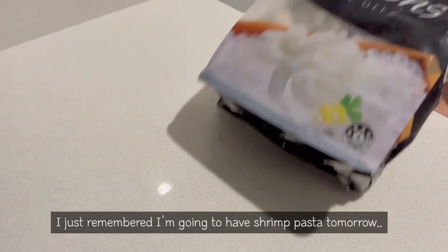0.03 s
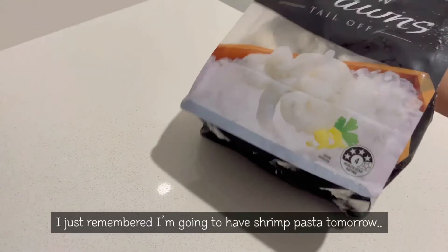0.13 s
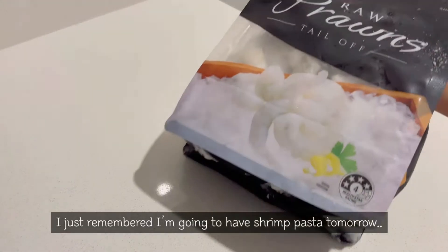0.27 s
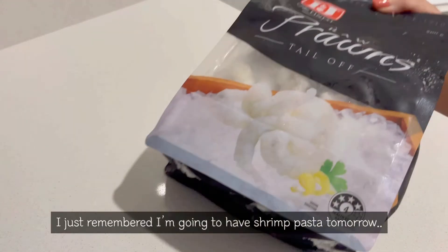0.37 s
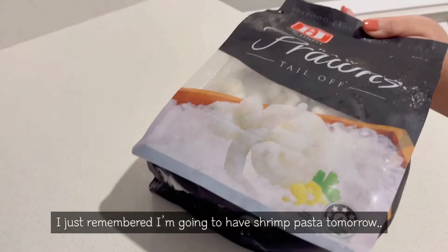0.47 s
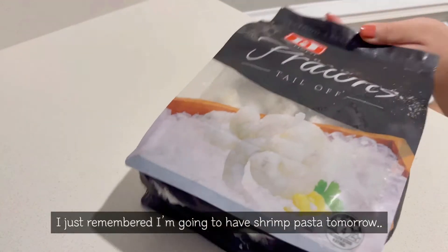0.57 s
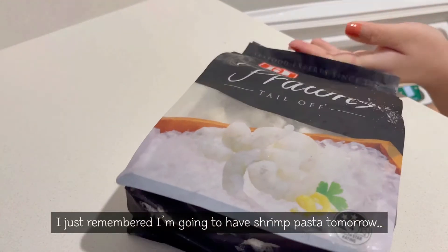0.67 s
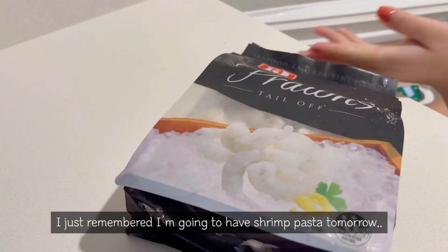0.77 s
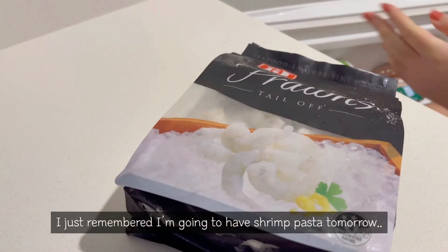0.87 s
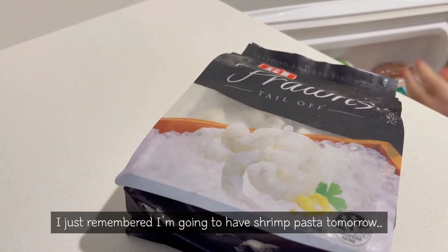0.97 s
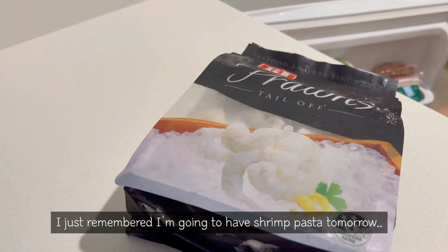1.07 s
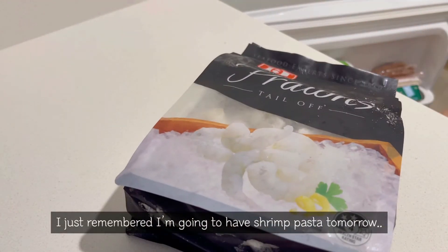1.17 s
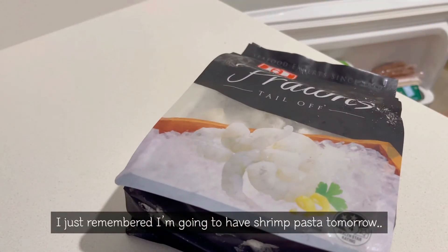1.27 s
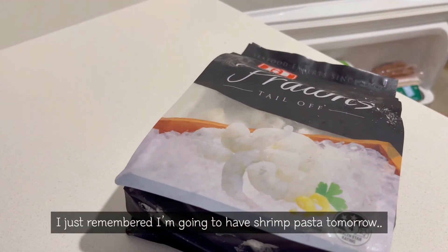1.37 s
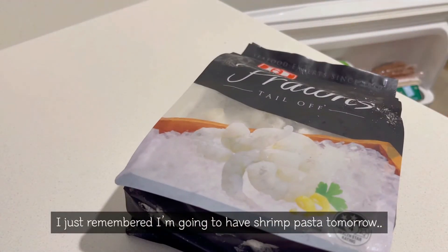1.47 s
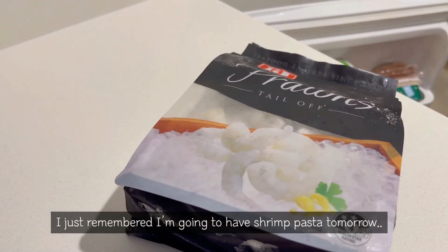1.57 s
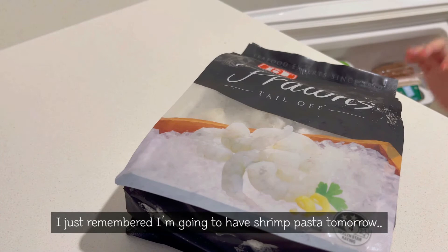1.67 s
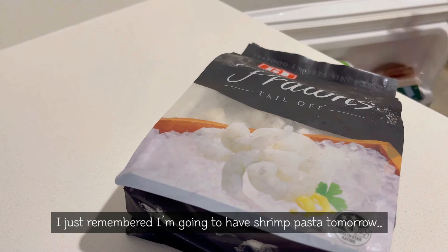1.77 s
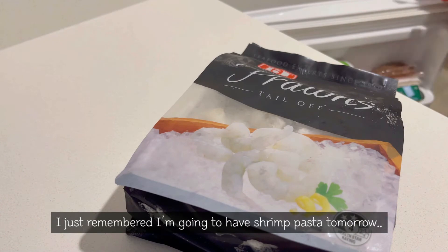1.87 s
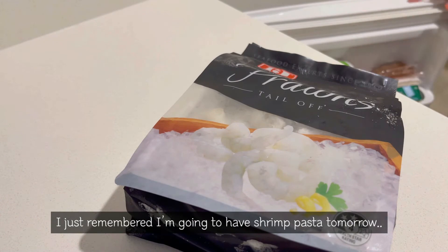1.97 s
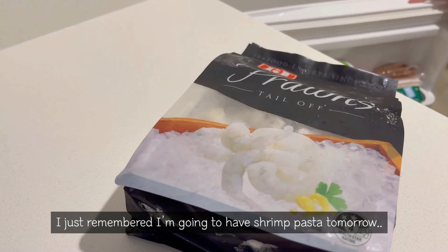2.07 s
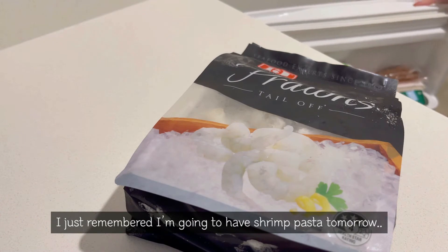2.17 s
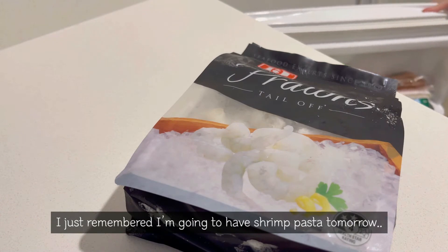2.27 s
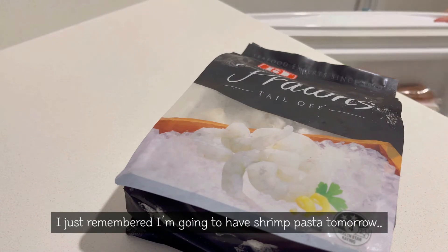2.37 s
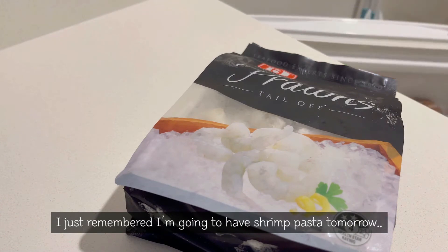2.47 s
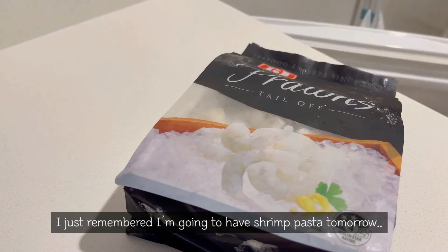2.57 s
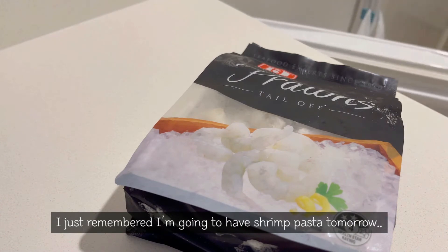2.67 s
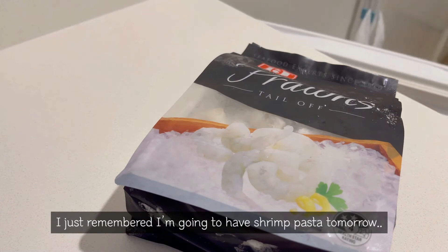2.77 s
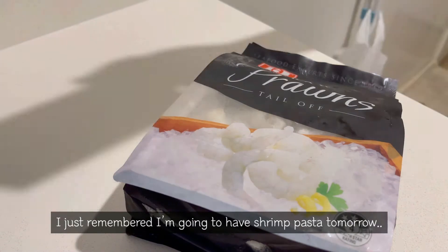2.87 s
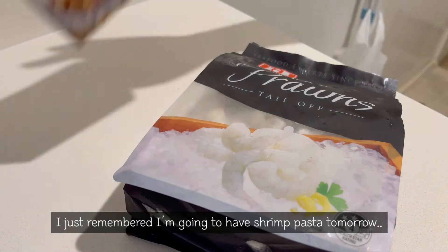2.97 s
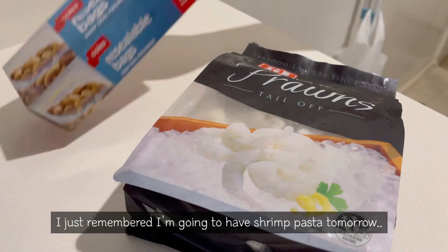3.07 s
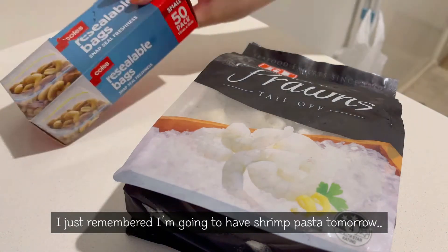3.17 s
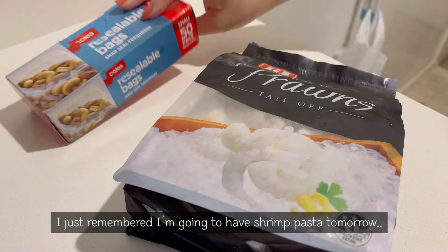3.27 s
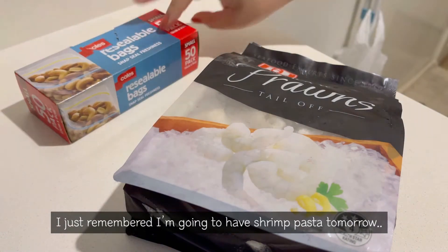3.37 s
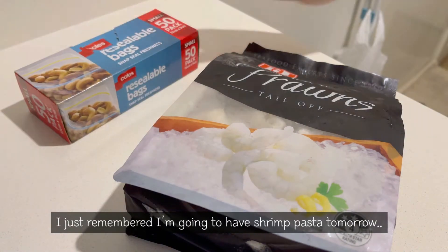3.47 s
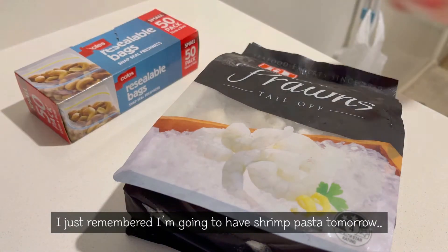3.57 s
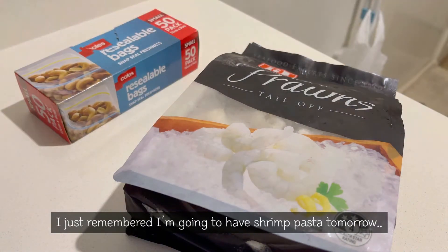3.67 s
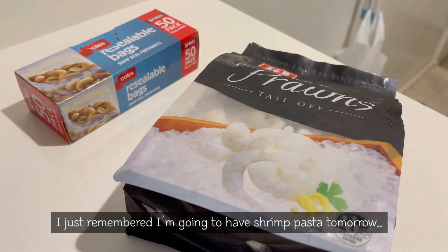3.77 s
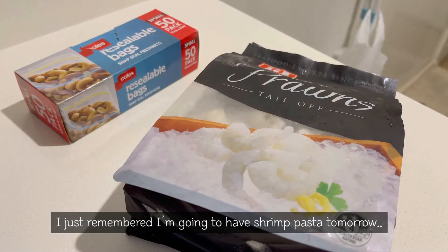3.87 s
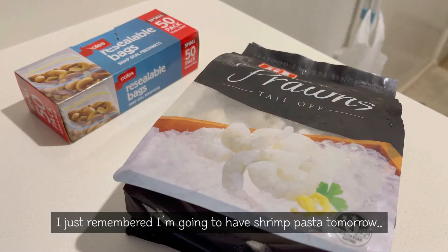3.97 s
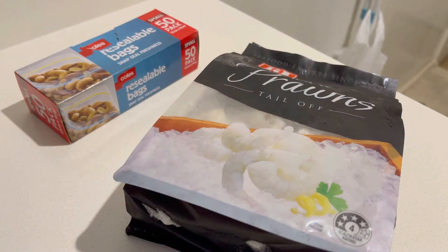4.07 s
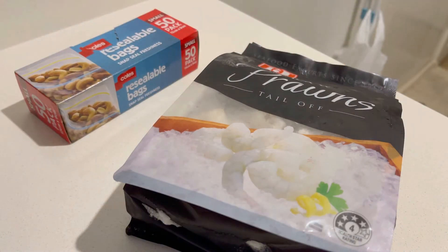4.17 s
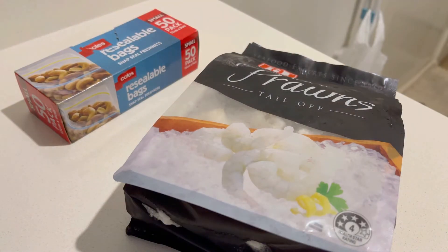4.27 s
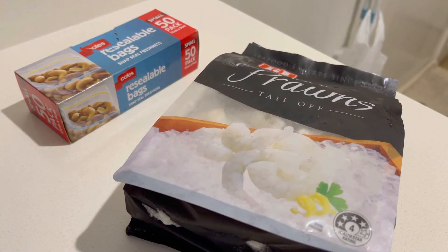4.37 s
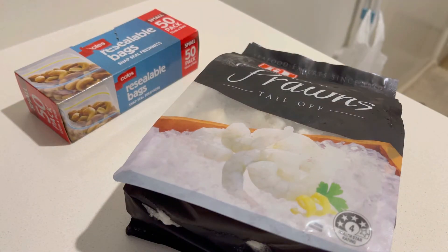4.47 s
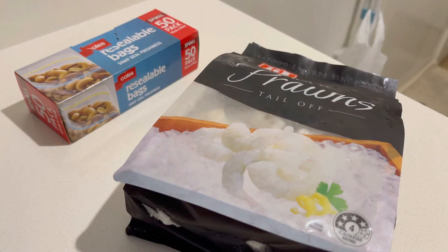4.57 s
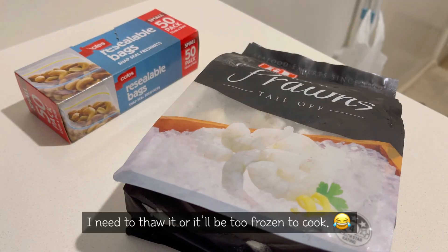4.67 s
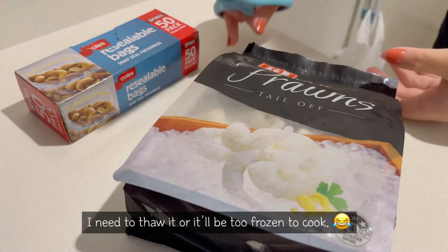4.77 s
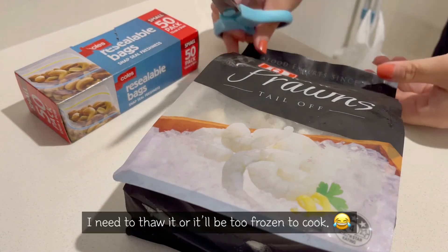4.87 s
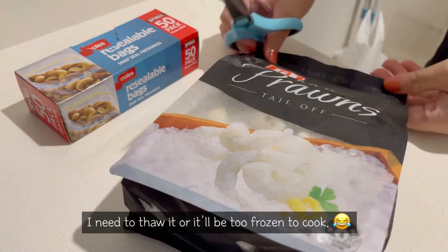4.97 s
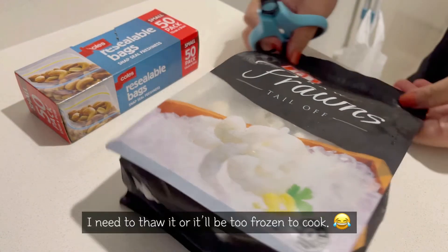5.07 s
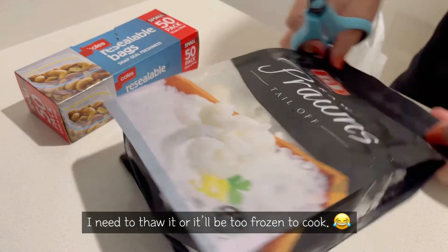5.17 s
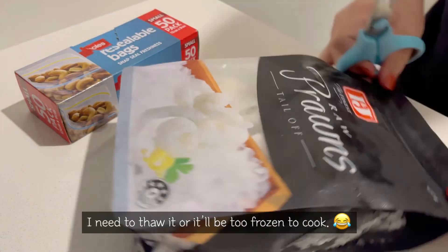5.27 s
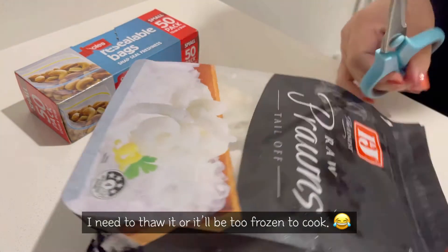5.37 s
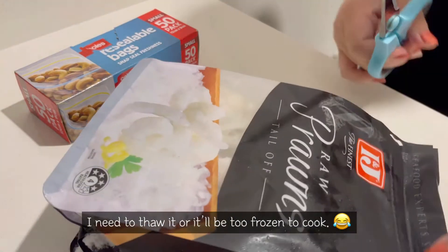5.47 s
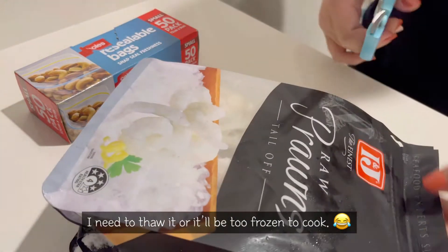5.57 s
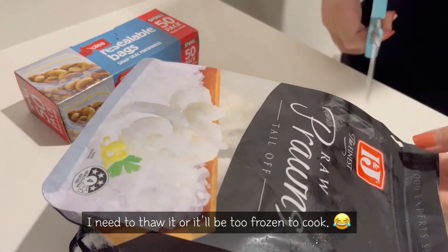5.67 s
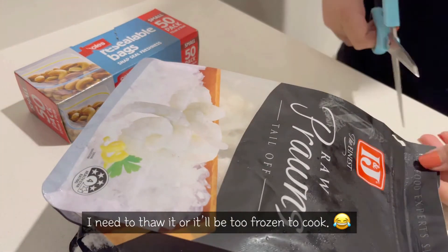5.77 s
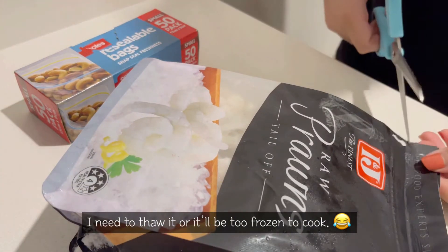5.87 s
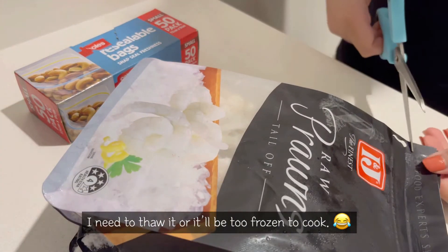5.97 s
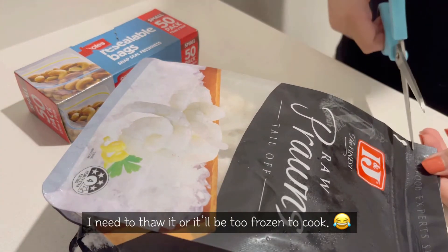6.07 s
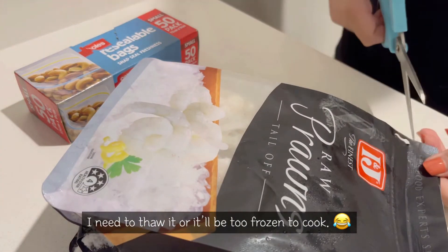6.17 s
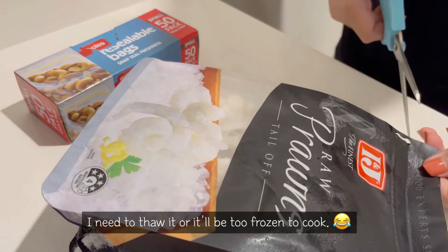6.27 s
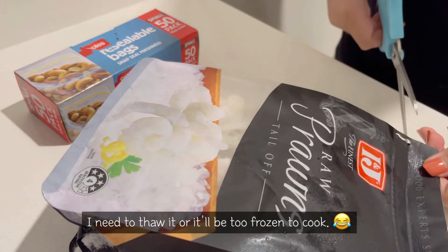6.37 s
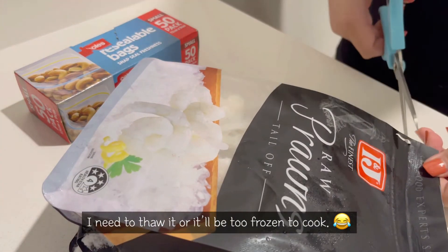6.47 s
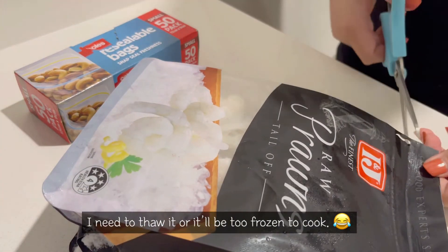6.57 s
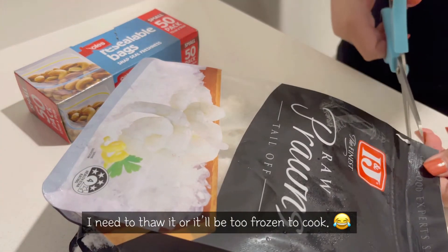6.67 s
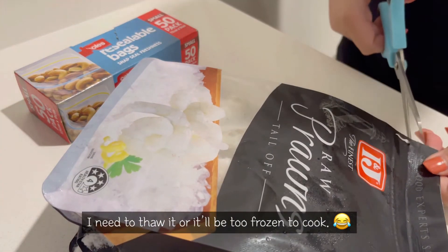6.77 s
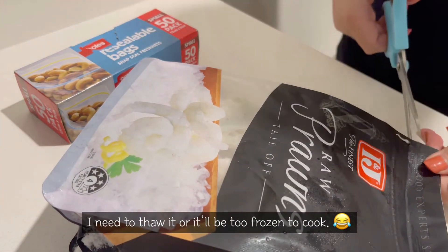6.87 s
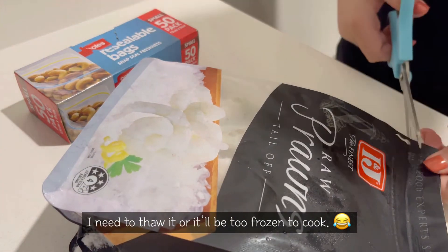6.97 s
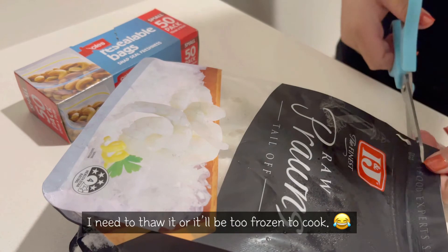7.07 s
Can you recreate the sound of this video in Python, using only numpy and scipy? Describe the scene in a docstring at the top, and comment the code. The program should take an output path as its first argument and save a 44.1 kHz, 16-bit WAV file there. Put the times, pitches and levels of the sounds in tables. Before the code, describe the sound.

A frozen bag of prawns crackles and clacks down on a counter, a cardboard box slaps beside it, then the bag is turned and snipped.

```python
"""Frozen prawns on a kitchen counter

A bag of frozen prawns is swung down: bursts of noise crackle as film, falling tones clack and thud as the load.
Filtered clicks shut a freezer further off, and a cardboard box slaps down with short damped tones.
The bag is turned, then scissors rasp and bite at its top. Quiet air, footsteps and a low drone lie behind.
Two microphone ports close above the counter hear it all in a small kitchen built from decaying noise.
"""
import sys
import numpy as np
from scipy import signal
from scipy.fft import rfft, irfft, next_fast_len
from scipy.io import wavfile

SR = 44100
rng = np.random.default_rng(int(sys.argv[2]) if len(sys.argv) > 2 else 0)


def output_pcm(signal):
    """Save a mono or channel-first signal as 16-bit PCM at the path in sys.argv[1].

    Samples are clipped to [-1, 1] before scaling.
    """
    pcm = np.clip(np.atleast_2d(signal).T, -1, 1) * 32767
    wavfile.write(sys.argv[1], SR, np.round(pcm).astype(np.int16))


N = 314433
TIME = np.arange(N) / SR  # seconds through the whole scene
AGE = np.arange(8192) / SR  # seconds since a single blow; each blow lasts at most 0.19 s

# The hands swing, lower, settle, grip, turn and nudge the bag. Each row: start in seconds (never before 0),
# attack in seconds, hold in seconds, relative level in dB.
BAG_MOVES = [(-.04, 0.023, 0.38, -35.5), (.36, 0.027, 0.3, -33.5), (.68, 0.071, 0.35, -55.5),
             (4.79, 0.043, 0.12, -49.5), (4.86, 0.14, 0.36, -37), (5.39, 0.019, 0.057, -49.5),
             (5.52, 0.052, 0.022, -60), (5.715, 0.002, 0.0037, -51)]


def handling():
    """The effort of the hands on the bag, which drives its crinkling and the counter's rumble."""
    return gestures(BAG_MOVES, release_s=0.16)


# The film buckling. Each row: time in seconds, relative level in dB, swell time in seconds,
# pitch of the ringing patch in Hz.
FILM_BUCKLES = [(0.028, -13.5, 0.0024, 1040), (0.1125, -24.5, 0.0028, 652), (0.1746, -28.5, 0.0056, 1543),
                (0.2111, -20, 0.0025, 1630), (0.296, -25, 0.004, 2039), (0.3872, -27.5, 0.0024, 1309),
                (0.4231, -23, 0.0025, 2917), (0.4795, -19, 0.0014, 1000), (0.5078, -21.5, 0.0018, 1642),
                (0.552, -21.5, 0.0022, 1570), (0.5676, -18.5, 0.002, 1112), (0.581, -21.5, 0.003, 1206),
                (0.6091, -15, 0.0022, 927), (0.6214, -28.5, 0.0012, 1800), (0.8164, -26, 0.00089, 2460),
                (4.982, -32.5, 0.001, 1494), (5.0598, -14.5, 0.0018, 1200), (5.2337, -23, 0.0019, 2790),
                (5.242, -31, 0.0047, 1160), (5.308, -20, 0.0018, 2280), (5.3987, -26.5, 0.00057, 4170)]
# Small sharp creases of the film. Each row: time in seconds, relative level in dB.
FILM_CREASES = [(0.6, -22), (0.678, -36.5), (0.695, -38.5), (1.0737, -66), (4.798, -50.5), (4.835, -46.5),
                (4.908, -44), (6.139, -45.5), (6.2598, -52), (6.644, -58.5), (6.831, -54.5), (7.091, -54)]
# Colour of the fine crinkling. Each row: frequency in Hz, relative level in dB.
CRINKLE_COLOUR = [(100, -13.5), (400, 3.5), (1100, -0.5), (5000, -5), (16000, -5.5)]
# Pitches at which the larger folds pop. Each entry: frequency in Hz.
FOLD_PITCHES = (750, 1400, 2600)


def bag(flex):
    """Film buckles and creases suddenly over fine crinkling and pitched pops of folds; prawns knock inside."""
    buckles = []
    flurry_moves = []
    for s, db, swell, hz in FILM_BUCKLES:
        tilt = 0.056 + 0.2164 * (db + 15)  # dB per octave: a harder buckle is brighter
        buckles.append((s, db, swell, tilt, hz))
        flurry_moves.append((s, swell, swell, db - 19))  # each buckle sets off fine crinkling
    flurries = gestures(flurry_moves, release_s=0.19)
    creases = [(s, db, 0.0015, 0.66, 8500) for s, db in FILM_CREASES]  # swell s, tilt dB per octave, body Hz

    # hiss is the smooth rubbing of the film beside its crackle
    fine = crackle(CRINKLE_COLOUR, rate=480, spread_db=4, grain_s=0.0004, hiss=0.25, apart=1.0)
    folds = 0
    for hz in FOLD_PITCHES:
        pop_colour = [(hz / 2, -20), (hz, 0), (2 * hz, -20), (8 * hz, -40)]
        folds = folds + crackle(pop_colour, rate=60, spread_db=3.5, grain_s=0.0006, hiss=0, apart=1.0)
    crinkling = (undb(-4) * fine + undb(-12.5) * folds) * np.hypot(flex, flurries)

    buckling = cracks(buckles, body_db=6, body_octaves=0.55, apart=0.25)
    creasing = cracks(creases, body_db=0.5, body_octaves=0.5, apart=0.5, even=True)
    return buckling + creasing + crinkling + prawns(sag_s=0.0045, cycles=1.1)


# Prawns knocking on the counter through the bag. Each row: time in seconds, relative level in dB,
# nominal pitch in Hz (the clack starts above it and falls through it).
PRAWN_KNOCKS = [(.054, -10, 926), (.0618, -15, 1020), (.126, -26, 610), (.2535, -16, 850), (.6125, -6, 729),
                (2.06, -39, 847), (5.019, -23.5, 610), (5.109, -17.5, 710), (5.167, -18, 686),
                (5.316, -16.5, 720), (6.333, -39.5, 840), (6.379, -36.5, 800), (7.108, -41.5, 670)]


def prawns(sag_s, cycles):
    """A clack of a few cycles whose pitch falls, as the high bending waves of the slab arrive first."""
    out = np.zeros((2, N))
    for s, db, hz in PRAWN_KNOCKS:
        turns = np.sqrt(2) * hz * sag_s * np.log(1 + AGE / sag_s)
        phase = 0.5 * rng.standard_normal((2, 1))  # radians, different at each port
        envelope = (1 - np.exp(-turns)) * np.exp(-turns / cycles)
        add(out, s, 2 * undb(db) * np.sin(2 * np.pi * turns + phase) * envelope)
    return out


# Strokes of the blades along the film. Each row: start in seconds, attack in seconds, hold in seconds,
# relative level in dB.
BLADE_STROKES = [(5.845, 0.0078, 0.077, -57), (6.03, 0.074, 0.037, -58), (6.25, 0.015, 0.11, -64),
                 (6.63, 0.04, 0.065, -63), (6.8, 0.12, 0.22, -57)]


def cutting():
    """The effort of the blades, which drives their rasp and the counter's rumble."""
    return gestures(BLADE_STROKES, release_s=0.95)


# Blades biting through the film. Each row: time in seconds, relative level in dB.
BITES = [(5.857, -43), (5.938, -46.5), (6.158, -32), (6.197, -42), (6.283, -48), (6.421, -50), (6.591, -45)]
# Colour of the rasp. Each row: frequency in Hz, relative level in dB.
RASP_COLOUR = [(100, 2.5), (500, -1), (2300, 1.5), (5000, -6.5), (16000, -12)]
# Resonances of the blades against the taut film. Each row: frequency in Hz, boost in dB.
BLADE_RESONANCES = [(1530, 0.95), (2080, 5), (2500, 2.6), (2920, 5.3)]


def scissors(shear):
    """Blades scrape along the film and bite it in steps; their resonances colour both sounds."""
    pitches = 1920 * 2 ** rng.uniform(-0.26, 0.42, len(BITES))  # Hz, a different patch for each bite
    bites = [(s, db, 0.0015, -4.5, hz) for (s, db), hz in zip(BITES, pitches)]  # swell s, tilt dB per octave
    rasp = crackle(RASP_COLOUR, rate=300, spread_db=3, grain_s=0.001, hiss=0.65, apart=0.74)
    scrape = rasp * shear * undb(0.79 * walk(24))
    cut = cracks(bites, body_db=2.5, body_octaves=1.0, apart=0.32, even=True) + scrape

    def blades(hz):
        width_hz = 120
        return sum(db / (1 + (2 * (hz - centre) / width_hz) ** 2) for centre, db in BLADE_RESONANCES)

    return colour(cut, [(1920, -2)], blades)  # a single point is the same at all frequencies


# Weight landing on the counter and bumps against it. Each row: time in seconds, relative level in dB,
# settled pitch in Hz.
COUNTER_THUDS = [(0.03, -27, 123), (0.125, -29, 211), (0.3, -23, 132), (0.6225, -11.5, 127),
                 (3.096, -24.5, 131), (3.298, -21.5, 188), (4.712, -35.5, 116), (5.347, -21, 155),
                 (5.757, -41, 118.5), (5.875, -38, 143), (5.943, -32.5, 114), (6.598, -38.5, 122)]
# Ringing of the counter slab. Each row: frequency in Hz, time to fall by 60 dB in seconds (before the
# fade at 0.19 s), relative level in dB.
SLAB_RINGING = [(119, 0.41, -13.5), (361, 0.19, -23.5)]
# Colour of low rumbling, in the counter and the floor. Each row: frequency in Hz, relative level in dB.
RUMBLE_COLOUR = [(30, -12), (70, 0.5), (135, 1.5), (450, -17), (4000, -50)]


def counter(effort):
    """Heavy contacts sink in pitch as they settle and ring the slab; work on the slab makes it rumble."""
    out = np.zeros((2, N))
    # each bite also knocks the bag against the counter, a little later and softer, at 258.6 Hz
    bite_knocks = [(s + 0.00617, db - 5, 258.6) for s, db in BITES]
    for s, db, hz in list(COUNTER_THUDS) + bite_knocks:
        pitch = hz * (1 + 0.51 * np.exp(-AGE / 0.0022))
        contact = np.sin(2 * np.pi * np.cumsum(pitch) / SR) * fade(0.064)
        envelope = (1 - np.exp(-AGE / 0.0023)) * (1 - (AGE / AGE[-1]) ** 2)
        add(out, s, undb(db + 6.0) * envelope * (contact + ring(SLAB_RINGING, scatter=0.087)))

    lag_s, growth = 0.042, 0.61  # smoothing time of the rumble, dB of rumble per dB of effort
    keep = np.exp(-1 / (lag_s * SR))
    smooth_effort = signal.lfilter([1 - keep], [1, -keep], effort)
    rumble_level = undb(-22) * smooth_effort ** growth
    unsteady = undb(4 * np.tanh(walk(15)))
    return out + rumble_level * unit(colour(pair(N, 0.35), RUMBLE_COLOUR)) * unsteady


# The box touching down, edge first and then flat. Each row: time in seconds, relative level in dB.
BOX_LANDINGS = [(3.0879, -29.5), (3.295, -20)]
# Panels and hollow of the box. Each row: frequency in Hz, time to fall by 60 dB in seconds,
# relative level in dB.
BOX_RINGING = [(238, 0.048, -1.5), (857, 0.049, 0), (1158, 0.041, 1)]
# Colour of a cardboard slap. Each row: frequency in Hz, relative level in dB.
SLAP_COLOUR = [(100, 6.5), (600, 8), (1200, 9), (1700, -3), (2300, 4), (3200, -6.5), (16000, -11)]


def box():
    """Dead cardboard slaps down in a few quick contacts; its panels and hollow ring briefly."""
    out = np.zeros((2, N))
    for s, db in BOX_LANDINGS:
        for lag_s, contact_db in ((0, -4), (0.004, 0), (0.009, -17)):
            slap = colour(burst(0.0012, apart=0.81, even=True), SLAP_COLOUR)
            add(out, s + lag_s, undb(db + contact_db) * slap)
        add(out, s, undb(db) * ring(BOX_RINGING, scatter=0.34) * (1 - AGE / AGE[-1]))
    return out


# Latches and things handled further off. Each row: time in seconds, relative level in dB,
# tilt in dB per octave, body pitch in Hz.
LATCH_CLICKS = [(1.5207, -44.5, 0.4, 2470), (1.592, -32.5, 0.55, 750), (1.9313, -35.5, 5, 1912),
                (2.1908, -51.5, 0.5, 2430), (2.6965, -48.5, 2.5, 1620), (3.9022, -52.5, -1, 799)]
# A faint ring after each click. Each row: frequency in Hz, time to fall by 60 dB in seconds (before the
# fade at 0.19 s), relative level in dB.
CLICK_RINGING = [(2625, 0.13, -17.5)]
# Things sliding, rustling and being picked up, away from the bag. Each row: start in seconds,
# attack in seconds, hold in seconds, relative level in dB.
SLIDING_MOVES = [(2.39, 0.045, 0.046, -64.5), (2.8, 0.074, 0.013, -44), (3.14, 0.12, 0.0075, -50),
                 (3.89, 0.014, 0.052, -57.5), (4.03, 0.07, 0.21, -66), (4.692, 0.0015, 0.02, -51.5)]
# Colour of the sliding. Each row: frequency in Hz, relative level in dB.
SLIDING_COLOUR = [(100, -6.5), (850, 0.5), (1800, -6.5), (4000, -14), (16000, -22.5)]
# Dull bumps and low rubs. Each row: time in seconds, relative level in dB, time to fall by 60 dB in
# seconds (before the fade that ends each one at 0.19 s), pitch in Hz.
DULL_BUMPS = [(0.94, -58.5, 1.9, 410), (3.656, -47, 0.7, 349.6), (4.09, -61, 2.4, 642)]
# Hollow colour of a bump or rub. Each row: frequency as a ratio to its pitch, relative level in dB.
BUMP_COLOUR = [(.4, -34), (1, 12), (1.6, -16), (8, -37.5)]


def freezer_and_handled_things():
    """Hard plastic clicks with a faint ring, grainy sliding and rustling, dull bumps and low rubs."""
    clicks = [(s, db, 0.00057, tilt, hz) for s, db, tilt, hz in LATCH_CLICKS]  # third column: swell s
    slide = crackle(SLIDING_COLOUR, rate=300, spread_db=4.5, grain_s=0.00097, hiss=0.83, apart=1.0)
    out = cracks(clicks, body_db=9.5, body_octaves=0.38, apart=0.59, even=True)
    out += undb(-2.5) * slide * gestures(SLIDING_MOVES, release_s=0.28)

    to_silence = 1 - AGE / AGE[-1]
    for s, db, tilt, hz in LATCH_CLICKS:
        add(out, s, undb(db) * ring(CLICK_RINGING, scatter=1) * to_silence)
    for s, db, t60, pitch in DULL_BUMPS:
        points = [(ratio * pitch, level) for ratio, level in BUMP_COLOUR]
        hollow = unit(colour(pair(len(AGE), apart=0.93), points))
        add(out, s, undb(db) * hollow * fade(t60) * to_silence)
    return out


# Someone moving about on the floor. Each row: start in seconds, attack in seconds, hold in seconds,
# relative level in dB.
FOOTFALLS = [(1.91, 0.026, 0.046, -54), (3.64, 0.037, 0.021, -54.5), (3.95, 0.11, 0.075, -52),
             (4.58, 0.097, 0.072, -53)]


def steps():
    """Someone moves about; each footfall is a swell of low noise, as if through the floor."""
    return gestures(FOOTFALLS, release_s=0.95) * unit(colour(pair(N, 0.36), RUMBLE_COLOUR))


# Colour of the still air. Each row: frequency in Hz, relative level in dB.
AIR_COLOUR = [(50, -3.5), (150, -5), (350, -21), (3000, -38.5), (9000, -38), (16000, -54)]


def background():
    """Steady noise is the kitchen air; a low, unsteady drone of band noise comes in once the freezer is shut."""
    air = undb(-62.5) * unit(colour(pair(N, 0.79), AIR_COLOUR))
    band = signal.butter(2, [40, 56], "band", fs=SR, output="sos")
    drone = unit(signal.sosfilt(band, rng.standard_normal(N)))
    drone_start_s, drone_attack_s = 2.7, 0.13
    entry = np.clip((TIME - drone_start_s) / drone_attack_s, 0, 1)
    return air + undb(-57) * drone * entry


def kitchen(x, early_db, late_db, t60_low, t60_high, thin_hz):
    """Quick reflections off counter and cupboards, then a tail that dulls as it dies; weak below thin_hz."""
    t = np.arange(SR) / SR
    early = unit(pair(SR, 3) * np.exp(-t / 0.013) * (t > 0.002))
    noise = rng.standard_normal((2, SR))
    low = signal.sosfilt(signal.butter(1, 3000, fs=SR, output="sos"), noise)
    high = noise - low
    tail = low * undb(-60 * t / t60_low) + high * undb(-60 * t / t60_high)
    late = unit(tail * (1 - np.exp(-t / 0.021)))
    thin = signal.butter(1, thin_hz, "high", fs=SR, output="sos")
    response = signal.sosfilt(thin, undb(early_db) * early + undb(late_db) * late)
    return x + signal.fftconvolve(x, response / np.sqrt(SR), axes=1)[:, :N]


def gestures(table, release_s):
    """Effort over time: each move swells, holds, then falls by 60 dB in release_s."""
    effort = np.zeros((1, N))
    for start, attack, hold, db in table:
        t = TIME[:int((attack + hold + release_s) * SR)]
        rise = np.clip(t / attack, 0, 1) ** 2
        fall = np.exp(-np.log(1000) * np.maximum(t - attack - hold, 0) / release_s)
        add(effort, start, undb(db) * rise * fall)
    return effort[0]


# Basic colour of a crack, before its tilt and body. Each row: frequency in Hz, relative level in dB.
CRACK_COLOUR = [(60, -32), (250, -5.5), (750, 0.5), (16000, -5)]


def cracks(table, body_db, body_octaves, apart, even=False):
    """Each crack has its own length and tilt, and rings the patch of material around it."""
    out = np.zeros((2, N))
    for s, db, swell, tilt, body_hz in table:
        def body(hz):
            bump = body_db * np.exp(-(np.log2(hz / body_hz) / body_octaves) ** 2)
            return bump + tilt * np.log2(np.clip(hz, 400, 13000) / 3000)

        add(out, s, undb(db) * colour(burst(swell, apart, even), CRACK_COLOUR, body))
    return out


def burst(swell, apart, even=False):
    """Tiny slips swell and die, with a smooth spectrum if even; energy equals 10 ms at rms 1."""
    x = pair(len(AGE), apart) * (AGE / swell) ** 2 * np.exp(-np.sqrt(2) * AGE / swell)
    if even:  # keep only the phases, so that every frequency is equally strong
        x = irfft(np.exp(1j * np.angle(rfft(x)))) * (1 - AGE / AGE[-1]) ** 2
    energy = np.mean(np.sum(x ** 2, axis=1))
    return x / np.sqrt(energy / (SR / 100))


def crackle(spectrum, rate, spread_db, grain_s, hiss, apart):
    """Many small slips (rate per second) of very unequal size over a smooth rub; rms 1."""
    size = undb(spread_db * np.minimum(rng.exponential(size=N), 4))
    slips = (rng.random(N) < rate / SR) * size ** 2
    power = signal.lfilter([1], [1, -np.exp(-1 / (grain_s * SR))], slips)
    envelope = np.sqrt(power / power.mean() + hiss ** 2)
    return unit(colour(pair(N, apart) * envelope, spectrum))


def ring(modes, scatter):
    """Damped modes, each reaching the two ports with its own phase."""
    out = 0
    for hz, t60, db in modes:
        phase = scatter * rng.standard_normal((2, 1))
        out = out + undb(db) * fade(t60) * np.sin(2 * np.pi * hz * AGE + phase)
    return out


def fade(t60):
    """Exponential decay of a blow, by 60 dB in t60 seconds."""
    return np.exp(-np.log(1000) * AGE / t60)


def pair(size, apart):
    """Noise at two ports: a shared part and a part that each hears alone."""
    noise = rng.standard_normal((3, size))
    return (noise[0] + apart * noise[1:]) / np.hypot(1, apart)


def walk(rate):
    """Slow random wander with a spread near 1, taking a new value rate times a second."""
    return 1.2 * np.interp(TIME * rate, np.arange(4000), rng.standard_normal(4000))


def colour(x, points, extra=lambda hz: 0):
    """Causal filter whose gain follows (Hz, dB) points plus an optional dB function."""
    size = 2 * next_fast_len(x.shape[-1])
    hz = np.fft.rfftfreq(size, 1 / SR) + 1e-3
    # folding the cepstrum forward in time gives the minimum-phase filter
    cepstrum = irfft(np.log(undb(on_log_axis(points, hz) + extra(hz))))
    cepstrum[1:size // 2] *= 2
    cepstrum[size // 2 + 1:] = 0
    return irfft(rfft(x, size) * np.exp(rfft(cepstrum)))[..., :x.shape[-1]]


def on_log_axis(points, hz):
    """Read (Hz, value) points at any frequency."""
    f, value = np.transpose(points)
    return np.interp(np.log(hz + 1e-3), np.log(f), value)


def undb(db):
    """Decibels to gain."""
    return 10 ** (np.asarray(db) / 20)


def unit(x):
    """Scale to rms 1."""
    return x / np.sqrt(np.mean(x ** 2))


def add(out, s, sound):
    """Mix a sound in at time s."""
    start = max(int(s * SR), 0)
    out[:, start:start + sound.shape[-1]] += sound[..., :N - start]


def scene():
    """The counter sounds are close; the clicks, sliding, bumps and rubs get a thinner, more echoing room."""
    flex, shear = handling(), cutting()
    on_counter = bag(flex) + scissors(shear) + box() + counter(flex + undb(2) * shear)
    near = kitchen(on_counter, early_db=-4.0, late_db=-13.5, t60_low=0.37, t60_high=0.3, thin_hz=200)
    handled = freezer_and_handled_things()
    far = kitchen(handled, early_db=-1.5, late_db=-8.5, t60_low=0.88, t60_high=0.3, thin_hz=1700)
    return near + far + steps() + background()


# Overall colour of the sound: boosted treble, then a steep fall above 12 kHz.
# Each row: frequency in Hz, gain in dB.
OVERALL_COLOUR = [(20, -10.5), (45, 0), (6500, 0.5), (8300, 8), (9600, 9), (11300, 8.5), (12300, -3),
                  (13300, -21), (16000, -26.5)]
# Level balance of the two ports. Each row: frequency in Hz, left minus right in dB.
LEFT_OVER_RIGHT = [(60, 1.4), (200, 8.2), (2500, 1.6), (6500, 4.9), (8200, 0.65)]
# Phase between the two ports. Each row: frequency in Hz, lead of the left in radians.
LEFT_LEAD = [(4000, 0), (7800, 1.15), (8800, 0.78), (10200, -3.5), (11900, -5)]
# How much of their difference the ports keep. Each row: frequency in Hz, gain in dB.
DIFFERENCE_KEPT = [(6000, 0), (8500, -20)]


def record(dry):
    """Two ports share a boosted treble but turn apart in phase; loud peaks are rounded and the top is cut."""
    size = next_fast_len(N + 4096)
    hz = np.fft.rfftfreq(size, 1 / SR)
    half = np.array([[0.5], [-0.5]])  # half of each difference goes to the left, half to the right
    balance = undb(half * on_log_axis(LEFT_OVER_RIGHT, hz))
    turn = np.exp(1j * half * on_log_axis(LEFT_LEAD, hz))

    sound = rfft(colour(dry, OVERALL_COLOUR), size)
    shared = sound.mean(axis=0)
    narrowed = shared + (sound - shared) * undb(on_log_axis(DIFFERENCE_KEPT, hz))
    heard = irfft(narrowed * balance * turn, size)[:, :N]

    rounded = heard / (1 + heard ** 4) ** (1 / 4)
    top_cut = signal.ellip(8, 0.2, 70, 16400, fs=SR, output="sos")  # cut above 16400 Hz
    return signal.sosfilt(top_cut, rounded)


dry = scene()
out = record(dry)
output_pcm(out)
```